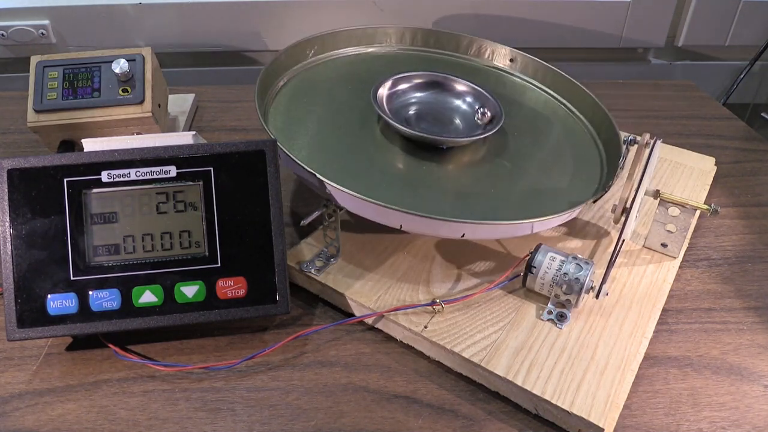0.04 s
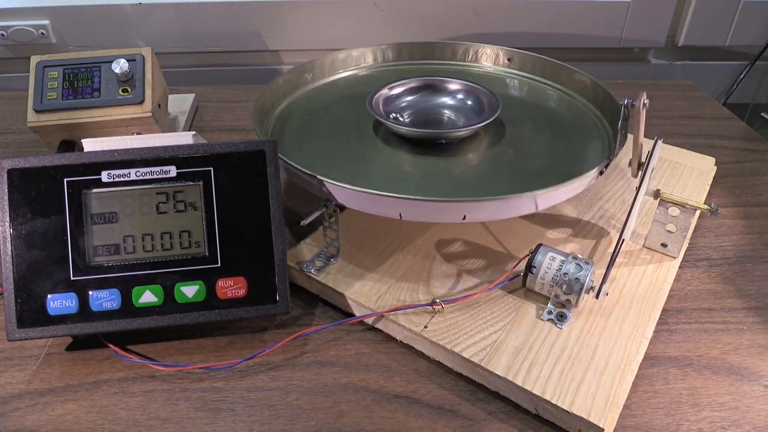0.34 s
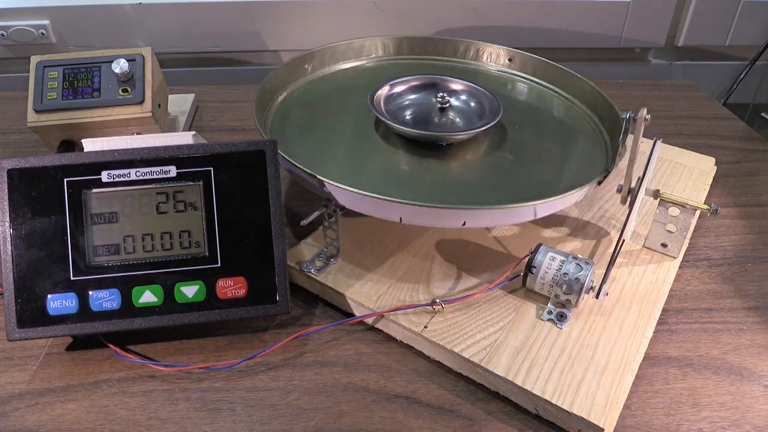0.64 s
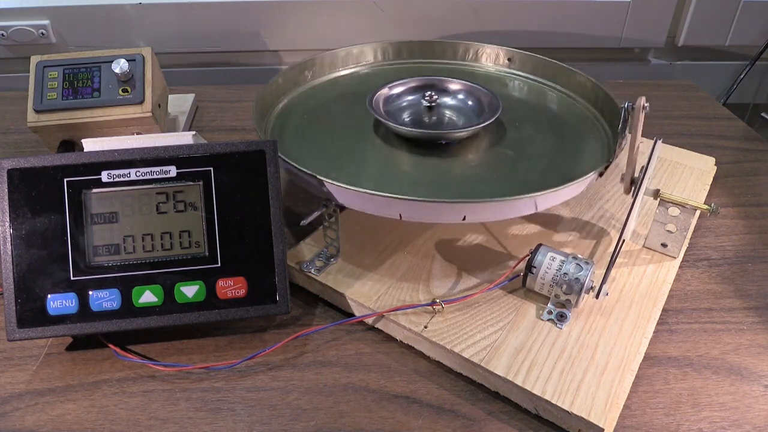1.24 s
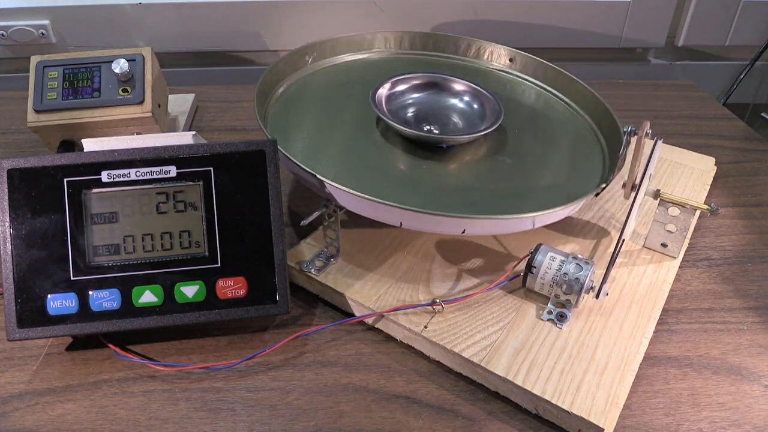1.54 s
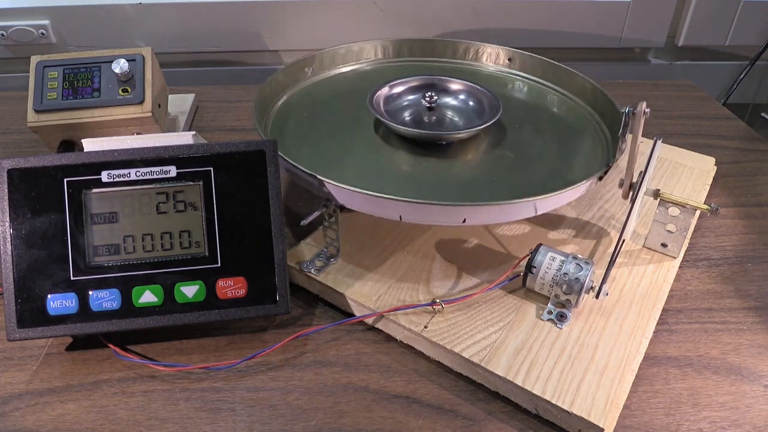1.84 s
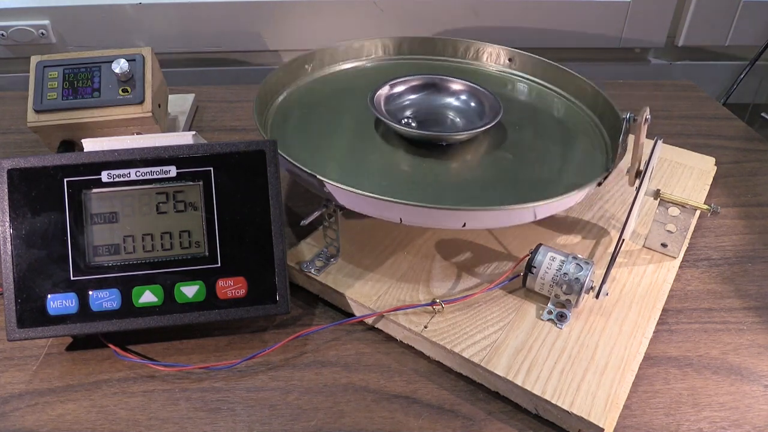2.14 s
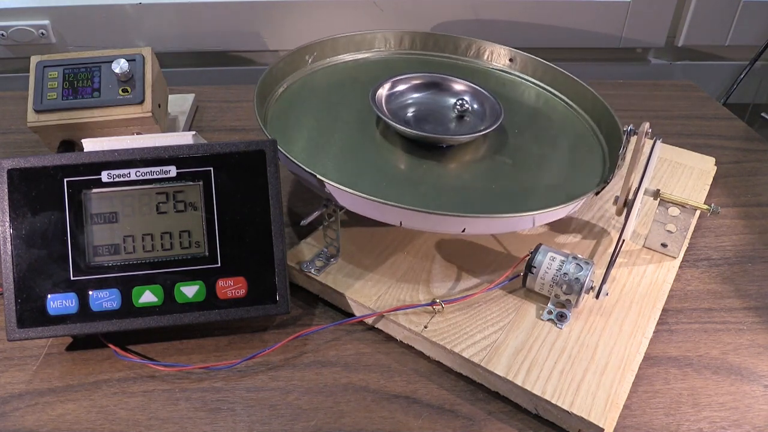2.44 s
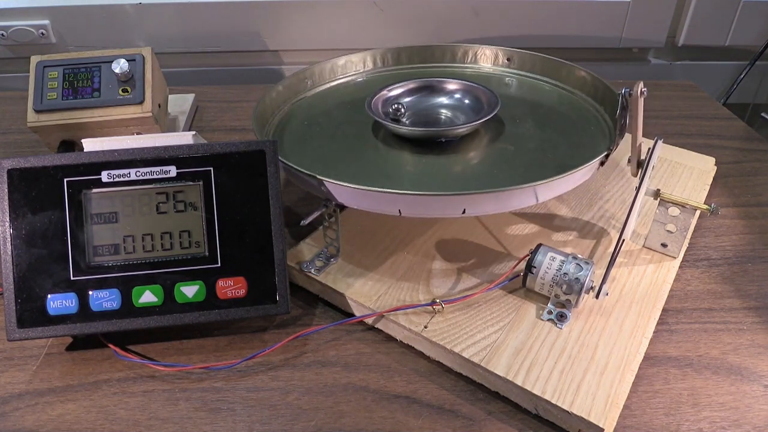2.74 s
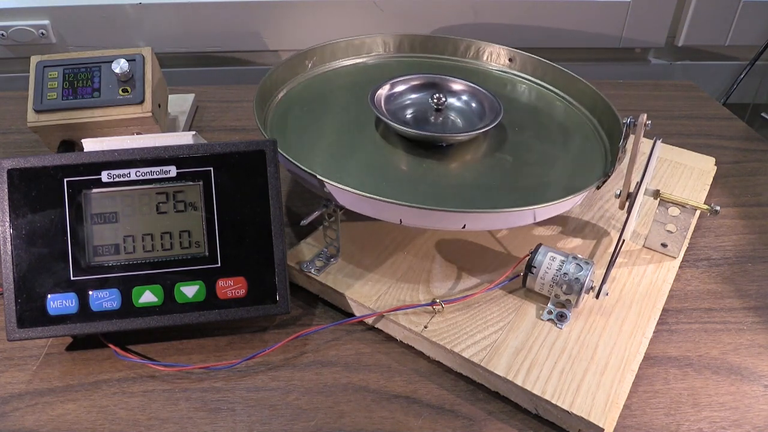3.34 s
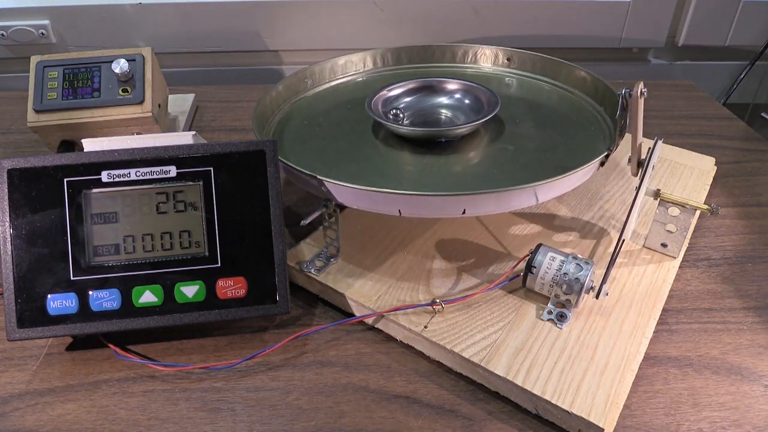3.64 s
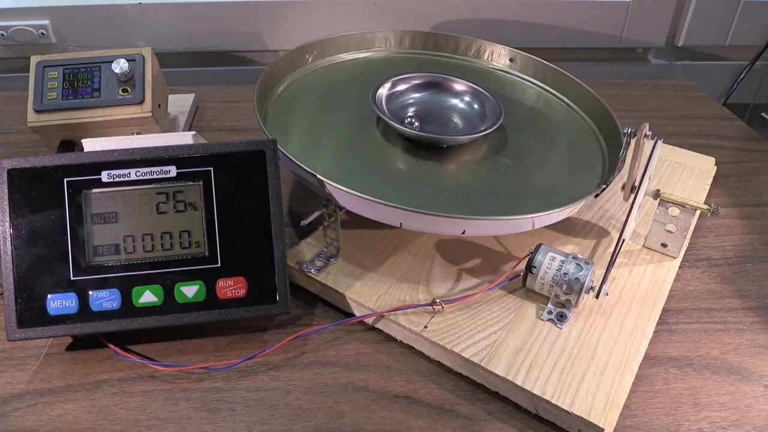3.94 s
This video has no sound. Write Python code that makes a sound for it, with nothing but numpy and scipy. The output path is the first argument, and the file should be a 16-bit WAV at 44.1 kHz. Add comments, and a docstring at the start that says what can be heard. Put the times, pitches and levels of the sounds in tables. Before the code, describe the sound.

A steel ball rattles and rings around a metal bowl over a faint motor whirr.

```python
"""A fine, ringing metal rattle dotted with knocks: a steel ball rolls round a small metal bowl on a
tray that a geared motor tilts to and fro. Thousands of tiny impacts ring tray and bowl, brighter when
the ball runs fast. It skims the wall and makes the bowl sing, squeaks and scratches on the steel, and
nearly stops at the end. Underneath, the motor whirrs and the wooden base rumbles on the table."""
import sys
import numpy as np
from scipy import signal
from scipy.fft import rfft, irfft
from scipy.io import wavfile

SR = 44100
rng = np.random.default_rng(int(sys.argv[2]) if len(sys.argv) > 2 else 0)


def master_out(mix):
    """Clip the mix to full scale and print it as 16-bit PCM to the path in sys.argv[1]."""
    frames = np.transpose(np.atleast_2d(mix))
    ceiling = np.clip(frames, -1, 1)
    pcm = np.round(ceiling * 32767).astype(np.int16)
    wavfile.write(sys.argv[1], SR, pcm)


N = 176400
T = np.arange(N) / SR


def amp(db):
    """Decibels to gain."""
    return 10 ** (np.asarray(db) / 20)


def unit(x):
    """Scales to rms 1."""
    return x / np.sqrt(np.mean(x ** 2) + 1e-20)


def curve(rows):
    """A level envelope drawn through (t/s, level/dB) breakpoints."""
    return np.interp(T, *np.transpose(rows))


def drift(hz):
    """Smooth random modulation of rms 1, rolled off above the given rate."""
    rolloff = 1 + (np.fft.rfftfreq(N, 1 / SR) / hz) ** 4
    return unit(irfft(rfft(rng.standard_normal(N)) / rolloff, N))


def colour(x, points, size=4096):
    """Minimum-phase EQ through (f/Hz, gain/dB) points."""
    hz, db = np.transpose(points)
    log_hz = np.log(abs(np.fft.fftfreq(size, 1 / SR)) + 1)
    log_gain = np.log(amp(np.interp(log_hz, np.log(hz), db)))
    taps = np.fft.ifft(np.exp(np.conj(signal.hilbert(log_gain)))).real
    return signal.fftconvolve(x, taps[:size // 2])[:N]


def ring(x, modes):
    """Drives a bank of decaying modes of alternating polarity; the narrower, the longer they ring."""
    t = T[:SR // 2]
    taps = np.zeros(len(t))
    for k, (hz, width, db) in enumerate(modes):
        gain = (-1) ** k * amp(db) * 2 * np.pi * width / SR
        taps += gain * np.exp(-np.pi * width * t) * np.sin(2 * np.pi * hz * t)
    return signal.fftconvolve(x, taps)[:N]


def tail(x, t60, patterns_per_s=9):
    """Dense reflections that die away; their pattern keeps changing as the source moves."""
    t, hop = T[:SR // 3], int(SR / patterns_per_s)
    padded = np.pad(x, (hop, 2 * hop))
    crossfade = np.sin(np.pi * np.arange(2 * hop) / (2 * hop))
    patterns = rng.standard_normal((64, len(t)))
    decay = amp(-60 * t / t60) * (t > .001)  # 1 ms pre-delay
    out = np.zeros(len(padded) + len(t))
    for k, at in enumerate(range(0, N + hop, hop)):
        taps = patterns[k % len(patterns)] * decay
        part = signal.fftconvolve(padded[at:at + 2 * hop] * crossfade, taps / np.linalg.norm(taps))
        out[at:at + len(part)] += part
    return out[hop:hop + N]


def tone(hz, waver_hz, waver_db=1.3):
    """A mode whose pitch and strength waver as the ball moves over the metal."""
    phase = 2 * np.pi * np.cumsum(hz + waver_hz * drift(65)) / SR
    return unit(np.sin(phase) * amp(waver_db * drift(38)))


def placed(x, left_db, room_db):
    """Panned direct sound plus a different short room tail at each ear."""
    return np.array([amp(side * left_db / 2) * x + amp(room_db) * tail(x, t60=0.15) for side in (1, -1)])


def rumble():
    """The rocking mechanism shakes the wooden base and the table."""
    # swells of the shaking: t/s, relative level/dB
    swells = [(0.0, -57), (0.1, -67), (0.41, -54), (0.47, -62), (0.52, -50.5), (0.62, -60.5), (1.04, -62),
              (1.05, -57), (1.36, -70.5), (1.4, -54.5), (1.66, -67.5), (2.39, -62), (2.53, -72),
              (2.71, -62.5), (2.93, -66), (3.0, -62), (3.15, -70), (3.36, -60), (3.4, -71), (3.69, -63),
              (3.94, -71), (4.0, -64)]
    # low body of the wood: f/Hz, gain/dB
    wood_eq = [(20, -27), (50, -38), (80, -7.5), (115, 4.5), (150, -2), (200, 2), (280, -7.5), (500, -21),
               (1500, -57)]
    return amp(curve(swells) - 1) * unit(colour(rng.standard_normal(N), wood_eq))


def motor(gear_hz=100.2, gear_depth=0.49, whirr_db=-54.5):
    """Gear noise pulses with the shaft, under faint whining tones that follow its speed."""
    # colour of motor and gears: f/Hz, gain/dB
    motor_eq = [(88, -30), (150, -5), (215, -13), (359, 0), (395, -5.5), (1140, -2.5), (2350, -1),
                (3250, -9), (4230, -12.5), (4840, -14.5), (11400, -26), (14000, -39)]
    # gear whine: f/Hz, level/dB
    partials = [(404, -76.5), (490, -71.5), (2196, -65)]
    shaft_time = np.cumsum(1 + 0.0047 * drift(3.54)) / SR  # the speed wanders slightly
    teeth = rng.standard_normal(N) * (1 + gear_depth * np.sin(2 * np.pi * gear_hz * shaft_time))
    whine = sum(amp(db) * np.sqrt(2) * np.sin(2 * np.pi * hz * shaft_time) for hz, db in partials)
    return amp(whirr_db) * unit(colour(teeth, motor_eq)) + whine


def scratches():
    """The ball scratches over the steel in short swells of fine, very high grit."""
    # scratch strokes: t/s, length/s, level/dB
    strokes = [(0.165, 0.073, -50), (0.396, 0.055, -58), (0.63, 0.1, -59), (1.043, 0.034, -57),
               (1.18, 0.035, -63), (1.337, 0.036, -59), (1.549, 0.086, -67), (1.769, 0.18, -62),
               (2.14, .06, -67), (2.22, 0.4, -77), (3.23, 0.11, -62)]
    # colour of the grit: f/Hz, gain/dB
    grit_eq = [(3000, -36), (8000, 2), (11000, 0), (12500, 2), (14000, 0), (15000, -30)]
    swell = sum(amp(db) * np.sin(np.pi * np.clip((T - s) / length, 0, 1)) for s, length, db in strokes)
    grit = rng.standard_normal(N) * amp(3.3 * drift(400))
    return swell * unit(colour(grit, grit_eq))


def squeaks(bend=0.027, bend_s=0.025, attack_s=0.0053):
    """Thin, unsteady squeaks and pings of steel on steel slide up onto a mode."""
    # squeaks and pings: t/s, final f/Hz, level/dB, t60/s
    pings = [(.125, 13240, -38.5, 0.37), (1.785, 13400, -47, 0.079), (2.475, 13280, -48, .07),
             (2.614, 2620, -35.5, 0.16), (3.66, 2200, -35, .14)]
    out = np.zeros(N)
    jitter = 1 + 0.0049 * drift(300)
    for s, top_hz, db, t60 in pings:
        at = int(s * SR)
        t = T[:N - at]
        hz = top_hz * jitter[at:] * (1 - bend * np.exp(-(t / bend_s) ** 2))
        envelope = np.minimum(t / attack_s, 1) * amp(db - 60 * t / t60)
        out[at:] += envelope * np.sin(2 * np.pi * np.cumsum(hz) / SR)
    return out


def singing():
    """The bowl's higher modes swell as the ball skims the wall, then ring on."""
    # singing modes: f/Hz, t60/s
    modes = [(5825, 0.32), (6708, 0.18), (10230, 0.085)]
    # skims along the wall: t/s, attack/s, length/s, then level/dB for each of the three modes
    skims = [(0, 0.0075, 0.018, -48, -52, -66), (.045, 0.0087, 0.058, -43.5, -44, -50.5),
             (.115, 0.011, 0.015, -39.5, -49, -47), (.28, 0.025, 0.061, -47, -48, -63),
             (0.499, 0.0043, 0.006, -29.5, -42, -47), (.532, 0.0098, 0.022, -54, -41, -45.5),
             (0.572, 0.0055, 0.0057, -29.5, -40, -67), (.77, .035, 0.072, -53.5, -58, -84),
             (1.02, 0.041, 0.045, -43, -48, -59), (1.075, 0.014, 0.025, -40, -66, -73),
             (1.42, 0.021, 0.048, -70, -48, -77), (1.655, 0.018, 0.064, -47.5, -52, -67),
             (2.374, .025, 0.037, -47, -62, -83), (3.125, 0.023, 0.04, -51.5, -59, -76)]
    out, t = np.zeros(N), T[:SR // 2]
    for k, (hz, t60) in enumerate(modes):
        power = np.zeros(N)
        for s, attack, length, *mode_db in skims:
            swell = np.minimum(t / attack, 1) * amp(mode_db[k] - 60 * np.maximum(t - length, 0) / t60)
            power[int(s * SR):][:len(t)] += swell ** 2
        out += np.sqrt(power) * tone(hz, waver_hz=11.2)
    return out


def humming(rest_hz=3092):
    """The bowl's lowest ring sounds throughout: sharp, louder and rough as the ball presses the wall."""
    # envelope of the ring: t/s, relative level/dB
    swells = [(0, -34), (.14, -52), (.18, -31.5), (.28, -30), (.33, -56), (.47, -29), (.52, -29),
              (.57, -38.5), (.67, -31), (.72, -46), (.78, -29), (.86, -50), (.96, -34), (1.02, -50),
              (1.08, -31.5), (1.15, -47), (1.19, -27), (1.25, -40), (1.29, -31.5), (1.45, -31.5),
              (1.49, -47), (1.54, -29.5), (1.6, -46), (1.74, -44), (1.82, -28.5), (1.91, -46), (1.97, -37),
              (2.2, -46), (2.42, -47), (2.52, -34.5), (2.65, -43), (2.83, -57), (3.2, -47), (3.4, -55),
              (4, -65)]
    # presses on the wall: peak t/s, length/s, mean pitch lift/Hz, added level/dB
    presses = [(0.068, 0.094, 105.8, -37.5), (0.132, .06, 132.8, -32.5), (0.311, .06, 106.6, -60),
               (0.554, .1, 103.3, -42), (0.832, 0.059, 54.3, -60), (1.1, .08, 62.6, -45),
               (1.682, 0.113, 75, -35.5), (2.371, .1, 81.3, -38.5), (3.169, 0.072, 78.6, -43)]
    lift, gain = np.zeros(N), amp(curve(swells) - 3.5)
    for s, length, lift_hz, db in presses:
        press = np.cos(np.pi * np.clip((T - s) / length, -.5, .5))
        lift += lift_hz * press
        gain += amp(db) * press ** 2
    roughness = 1 + 0.39 * drift(111)
    return gain * tone(rest_hz + lift * roughness, waver_hz=5.62)


def metal(force, reflected_share, node_db=2.5, node_rate_hz=9.4):
    """Tray and bowl ring under a contact force; reflections in the metal shift as the contact travels."""
    # broad body of the tray: f/Hz, gain/dB
    tray_eq = [(30, -50), (100, -43), (300, -35.5), (480, -21.5), (550, -23.5), (650, -20), (700, -11),
               (860, -11.5), (920, -7), (1040, -14.5), (1260, -11), (1330, -5), (1550, -3.5), (1850, -7.5),
               (2120, -4.5), (2420, -14), (2850, -8.5), (3200, -9), (3600, -11), (4100, -13.5),
               (4600, -16.5), (5400, -22.5), (6000, -22), (6450, -26.5), (7300, -26.5), (8200, -38),
               (10500, -36.5), (12500, -43), (14800, -42)]
    # tray resonances: f/Hz, width/Hz, gain/dB
    tray_modes = [(599.4, 9.3, -9.5), (705.5, 12.8, -1.5), (731.6, 19.6, 1), (784.7, 17, 5), (831, 12.8, 3),
                  (866, 11.7, 7.5), (940, 5.4, -1.5), (1457, 8.5, -3), (1552, 32, -1), (1619.4, 20.3, -0.5),
                  (1933, 7.6, -6.5), (2012, 7.7, -3), (2106, 6.8, 3), (2242, 16.5, -0.5), (2677, 19, -6.5),
                  (2920, 7.7, -2)]
    # bowl resonances: f/Hz, width/Hz, gain/dB
    bowl_modes = [(3123, 8.7, -0.5), (5970, 6.4, -24), (6770, 9.9, -15), (6960, 9.2, -14), (7082, 16, -7),
                  (7260, 23.7, -4), (7280, 16, -10), (7460, 26, -5), (7630, 19, -8), (10200, 42, -40)]
    smeared = np.sqrt(1 - reflected_share) * force + np.sqrt(reflected_share) * tail(force, t60=0.032)
    # each bowl mode swells and fades as the ball crosses its nodes
    bowl = sum(ring(force * unit(amp(node_db * drift(node_rate_hz))), [mode]) for mode in bowl_modes)
    return colour(smeared, tray_eq) + ring(force, tray_modes) + bowl


def knocks(drive_db=9, chatter_db=-20.5, chatter_s=0.0079):
    """Force of the ball knocking on the bowl: each a sharp blow and a short chatter of rebounds."""
    # blows: t/s, relative level/dB
    blows = [(0.065, 0), (.1346, 2.5), (.183, 3), (0.207, 0), (.4075, 3), (.4424, -11), (.4943, 6),
             (0.4963, -9), (0.4987, 0), (.5007, 2), (0.523, 3.5), (0.653, -2), (.701, 2), (0.991, -1),
             (1.021, -15), (1.0517, 6.5), (1.077, -6), (1.193, -9), (1.35, -9), (1.5214, 0), (1.613, 0),
             (1.6637, 0.5), (1.997, -18), (2.16, -24), (2.521, -15), (2.891, -16), (2.949, -4), (2.983, -6),
             (3.057, -6), (3.1, -7.5), (3.235, -10), (3.293, -8), (3.476, -11)]
    # the contact time softens each blow: f/Hz, gain/dB
    contact_eq = [(40, -63), (200, 6.5), (800, -4.5), (3000, 0), (6000, -6.5), (10000, -5.5), (14000, -5)]
    force = np.zeros(N)
    chatter = rng.standard_normal(N) * amp(chatter_db)
    for s, db in blows:
        at = int(s * SR)
        force[at] += amp(db)
        force[at:] += amp(db) * chatter[at:] * np.exp(-T[:N - at] / chatter_s)
    return amp(drive_db) * colour(force, contact_eq)


def rolling(grains_per_s=2400, spread_db=5.5, smooth_share=0.39):
    """Force of the rolling ball: tiny impacts whose strength and hardness follow its run."""
    # drive of the tray's drone: t/s, relative level/dB
    drone = [(0.0, -34.5), (0.41, -30.5), (0.43, -33.5), (0.59, -32.5), (0.98, -37), (1.2, -31.5),
             (1.24, -35.5), (1.48, -31), (1.68, -39), (1.79, -30.5), (1.92, -42.5), (2.0, -34.5),
             (2.21, -43.5), (2.27, -36), (2.73, -41), (2.76, -36.5), (2.87, -48), (2.95, -40), (3.06, -41),
             (3.25, -29.5), (3.38, -44), (3.7, -48), (3.89, -72), (4.0, -50)]
    # drive of the midrange rattle: t/s, relative level/dB
    rattle = [(0, -26), (.1, -34.5), (.21, -28.5), (.3, -32.5), (.44, -28.5), (.52, -34.5), (.62, -32),
              (.8, -31.5), (.92, -31), (1.05, -30), (1.14, -31.5), (1.4, -30), (1.72, -32), (1.9, -33),
              (2.13, -36.5), (2.24, -32.5), (2.36, -30.5), (2.42, -34), (2.48, -31.5), (2.6, -40),
              (2.68, -35), (2.79, -35), (2.83, -46.5), (2.885, -42), (2.9, -34.5), (2.95, -34.5),
              (3.03, -42), (3.08, -32), (3.26, -31.5), (3.38, -38.5), (3.46, -37), (3.57, -47),
              (3.72, -44.5), (3.79, -67), (3.92, -70), (4, -50)]
    # drive of the treble: t/s, relative level/dB
    treble = [(0, -37), (.07, -32.5), (.22, -36.5), (.32, -34.5), (.48, -36), (.52, -28.5), (.59, -34),
              (.68, -49.5), (.8, -36.5), (.9, -45), (1.05, -32), (1.15, -43), (1.3, -40.5), (1.48, -39.5),
              (1.56, -40), (1.7, -39), (1.8, -48), (2.13, -50.5), (2.24, -43), (2.38, -43.5), (2.6, -58.5),
              (2.88, -53.5), (2.96, -50), (3.03, -47.5), (3.08, -46), (3.19, -41.5), (3.3, -58),
              (3.42, -88), (3.7, -63), (4, -63)]
    # drive of the bowl's shimmer: t/s, relative level/dB
    shimmer = [(0.0, -43.5), (0.05, -41.5), (0.43, -48.5), (0.56, -37.5), (0.62, -45.5), (0.97, -53.5),
               (1.06, -48), (1.11, -49.5), (1.19, -45.5), (1.22, -52), (1.4, -43), (1.47, -50), (1.69, -48),
               (1.87, -52.5), (1.95, -58), (2.05, -55.5), (2.17, -60.5), (2.25, -54), (2.38, -49),
               (2.47, -54.5), (2.58, -65.5), (2.78, -58.5), (2.83, -72), (2.92, -68), (2.96, -60),
               (3.04, -73), (3.06, -53), (3.09, -55.5), (3.21, -47), (3.4, -69), (3.46, -76), (3.48, -64),
               (3.54, -79), (3.65, -77), (3.685, -59), (3.75, -91), (4.0, -83)]
    centres_hz = [850, 1700, 4440, 7900]
    levels_db = [curve(drone) + 17, curve(rattle) + 16, curve(treble) + 19.5, curve(shimmer) + 26.5]
    clicks = (rng.random(N) < grains_per_s / SR) * rng.choice([-1, 1], N)
    grains = unit(clicks * amp(spread_db * np.minimum(rng.exponential(1, N), 4)))
    hiss = unit(rng.standard_normal(N))
    texture = np.sqrt(1 - smooth_share) * grains + np.sqrt(smooth_share) * hiss
    flutter = amp(-0.03 * drift(93))
    spectrum = rfft(unit(texture * flutter))
    # four bands crossfade from centre to centre, each on its own envelope
    log_hz = np.log(np.fft.rfftfreq(N, 1 / SR) + 1)
    bands = [np.interp(log_hz, np.log(centres_hz), peak) for peak in np.eye(len(centres_hz))]
    return sum(irfft(spectrum * band, N) * amp(db) for band, db in zip(bands, levels_db))


def scene():
    """Ball up front, motor and base beneath it, in a small room."""
    ball = metal(rolling(), reflected_share=0.56) + metal(knocks(), reflected_share=0.22)
    ball += humming() + singing() + squeaks() + scratches()
    return (placed(ball, left_db=0.3, room_db=-8)
            + placed(motor(), left_db=2.5, room_db=0.0)
            + placed(rumble(), left_db=3.5, room_db=-1.5))


def record(dry):
    """A steep low-pass takes off the air above 14.9 kHz."""
    lowpass = signal.firwin(511, 14900, window=("kaiser", 9), fs=SR)
    return signal.oaconvolve(dry, lowpass[None], "same")


dry = scene()
out = record(dry)
master_out(out)
```